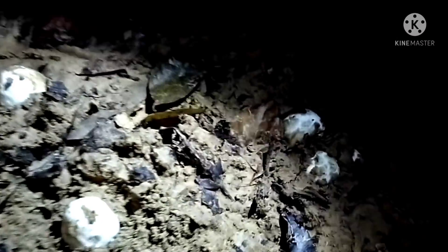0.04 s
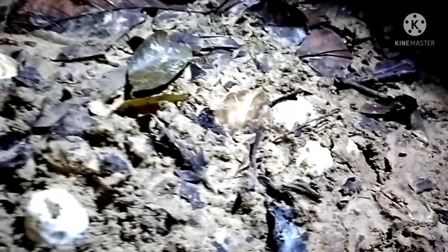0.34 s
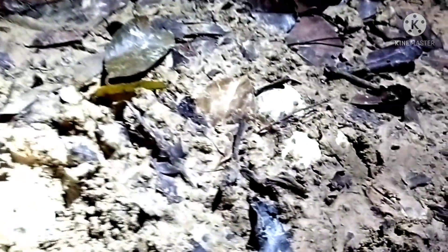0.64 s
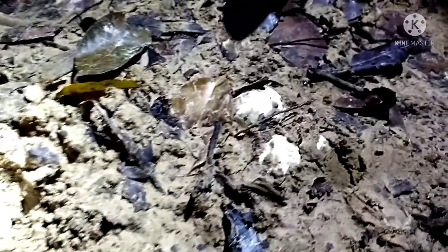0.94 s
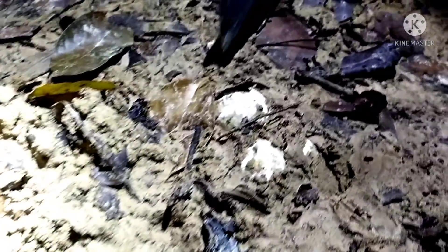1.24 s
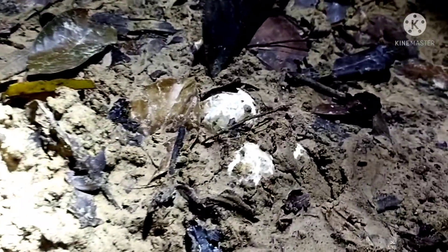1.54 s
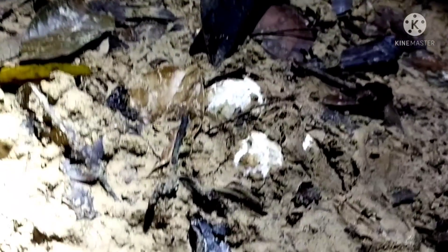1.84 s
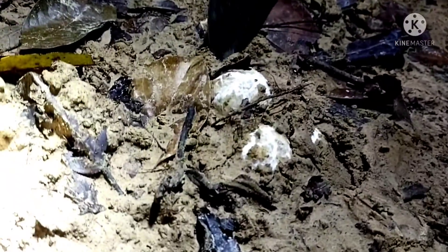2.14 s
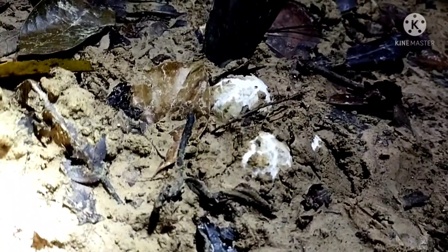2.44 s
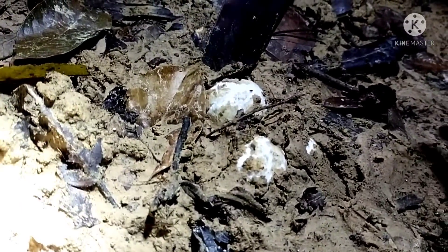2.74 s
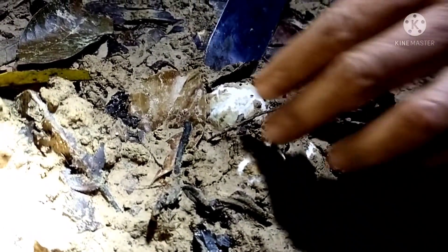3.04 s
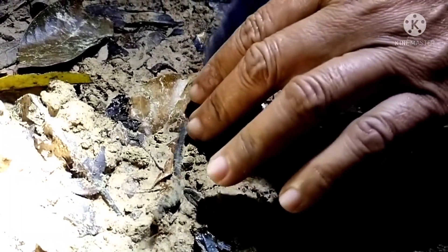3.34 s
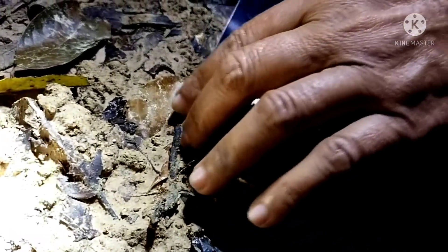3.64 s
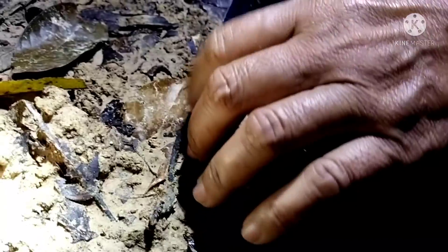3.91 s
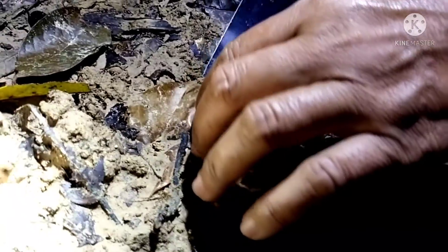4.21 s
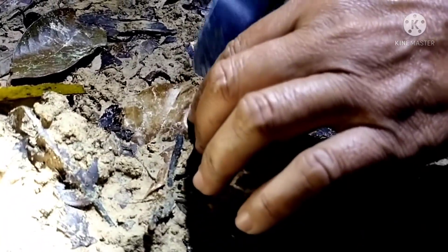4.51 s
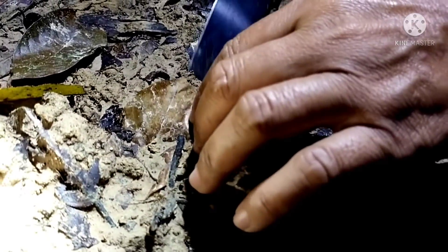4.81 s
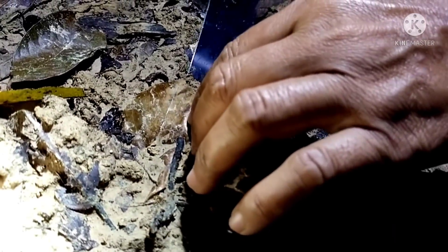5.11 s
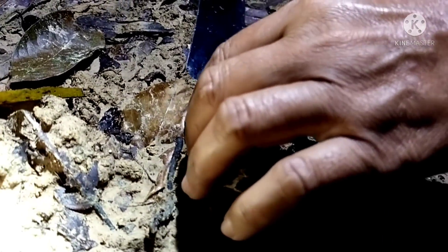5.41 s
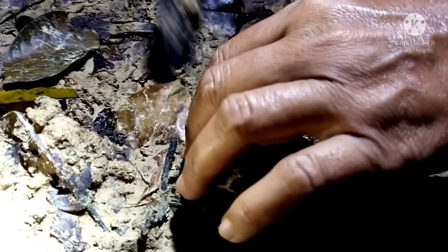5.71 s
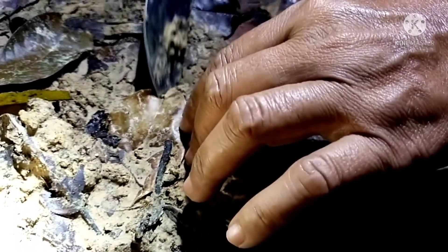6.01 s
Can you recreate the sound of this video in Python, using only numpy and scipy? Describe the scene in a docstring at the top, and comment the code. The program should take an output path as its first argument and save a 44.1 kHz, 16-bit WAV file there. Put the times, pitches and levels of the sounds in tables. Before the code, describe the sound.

High insect chirps pulse about four times a second over a soft night forest hush. Close by, dry leaves stir and crumbs of soil click, with soft thuds and a dead knock on the right at 0.8 seconds. From 1 second a blade scrapes into soil and leaves, crunching and crackling, the steel ringing faintly. Around 2 seconds the hush drops and the insects thin out, while the digging turns lighter. A stronger gritty scrape comes at 2.6 seconds, then short rustling strokes; the higher insects return at about 3.2. At 4.1 seconds a root or twig snaps loudly, the sharpest sound, followed by crumbling clicks. The blade drags with a hollow hiss near 4.8, and a cluster of crackles falls between 5.3 and 5.7. From about 6 seconds a rasping, gritty drag ends in a click and soft thud, with insects still chirping.

```python
"""A forest floor at night: close by, a blade scrapes and pries in crumbly soil and dry leaves.
Countless tiny breaks make the soil crunch, the leaves rustle and the grit hiss, and grains catching
on the steel make it ring. Bigger crumbs click, there are soft thuds and one dead knock, and once a root
or twig snaps loudly. Behind it, groups of insects chirp by rubbing their wings, over a soft hush."""
import numpy as np
from scipy import signal
from scipy.fft import rfft, irfft, next_fast_len
from scipy.ndimage import uniform_filter1d, map_coordinates
import sys
import numpy as np
from scipy import signal
from scipy.fft import rfft, irfft, next_fast_len
from scipy.io import wavfile
from scipy.ndimage import uniform_filter1d, map_coordinates

SR = 44100
rng = np.random.default_rng(int(sys.argv[2]) if len(sys.argv) > 2 else 0)


def unload_audio(sound):
    """Save the sound as a 16-bit wav file, at the path given as the first command line argument."""
    columns = np.transpose(np.atleast_2d(sound))
    # keep every value between -1 and 1, then stretch to whole-number steps
    steps = np.round(np.clip(columns, -1, 1) * 32767)
    wavfile.write(sys.argv[1], SR, steps.astype(np.int16))


N = 276066
TIME = np.arange(N) / SR
FFT_SIZE = next_fast_len(N, real=True)
FFT_HZ = np.fft.rfftfreq(FFT_SIZE, 1 / SR)

# Levels are starting values that a function may shift. A side_db above 0 is left, below 0 is right.
# blade strokes through the ground: start_s, rise_s, hold_s, release_s, soil_db, leaves_db, grit_db, tip_db
STROKES = [(1.03, 0.44, .17, .2, -58, -51, -56, -56.5), (1.34, 0.054, 0.036, .08, -65, -49.5, -64, -52.5),
           (1.66, 0.013, 0.13, 0.13, -62.5, -54.5, -63, -63), (1.8, 0.038, 0.26, .1, -85, -80, -73.5, -81),
           (1.935, 0.013, 0.013, 0.12, -72, -62, -71, -66.5),
           (2.04, 0.053, 0.13, 0.2, -63.5, -61.5, -62.5, -69.5),
           (2.16, 0.013, 0.057, .05, -75, -59.5, -59, -76),
           (2.3, 0.011, 0.067, 0.97, -81.5, -63, -63.5, -74.5),
           (2.545, 0.021, 0.07, 0.042, -54.5, -49.5, -47.5, -59),
           (2.635, 0.011, .015, 0.11, -52.5, -65, -79, -67),
           (2.77, 0.0081, 0.16, 0.034, -79, -67, -102, -75.5),
           (2.965, 0.024, 0.0091, 0.042, -65, -61, -67.5, -76),
           (3.03, 0.0087, 0.093, 0.13, -91, -62, -73, -71),
           (3.275, 0.061, 0.089, 0.029, -81, -62, -65, -98),
           (3.403, 0.053, 0.02, 0.1, -55.5, -44.5, -49.5, -68),
           (3.6, 0.036, 0.055, 0.2, -93, -58.5, -58.5, -69.5),
           (3.78, 0.098, 0.31, 0.36, -61, -52.5, -62, -65), (3.915, 0.02, 0.017, 0.059, -70, -51, -82, -60),
           (4.072, 0.005, 0.05, 0.1, -63, -53, -57.5, -70),
           (4.148, 0.028, 0.044, 0.084, -54.5, -42.5, -57, -58),
           (4.28, 0.026, 0.025, 0.12, -66.5, -54, -63.5, -75),
           (4.42, 0.039, 0.036, 0.055, -71, -57, -67, -78),
           (4.49, 0.059, 0.039, 0.14, -73.5, -62, -56.5, -86),
           (4.67, 0.23, 0.067, 0.07, -65, -56, -51, -76), (4.98, 0.021, 0.16, .15, -92.5, -82, -75.5, -82),
           (5.17, 0.054, 0.11, .1, -90, -65.5, -75, -83),
           (5.31, 0.08, 0.051, 0.22, -59.5, -48.5, -59.5, -77),
           (5.56, 0.038, 0.051, 0.11, -55.5, -51, -58.5, -78),
           (5.63, 0.059, 0.022, 0.079, -62.5, -52.5, -50.5, -75),
           (5.94, 0.06, 0.35, 0.094, -64, -58, -52, -67.5), (6.0, 0.3, .05, .1, -70, -54, -68, -70)]
STROKE_SOIL, STROKE_LEAVES, STROKE_GRIT, STROKE_TIP = 4, 5, 6, 7  # column numbers
# light stirring of the leaves between strokes: time_s, level_db
STIR = [(0, -58), (.55, -64.5), (.95, -54), (1.3, -76), (1.9, -78), (3.25, -75), (4.5, -86), (5.25, -74.5),
        (5.9, -92.5)]
# crumbs and leaves giving way: start_s, soil_db, leaves_db, grit_db, grit_side_db, ring_hz
CLICKS = [(0.029, -55, -49.5, -77, 0, 2470), (0.102, -68, -53, -75, 0, 1850),
          (0.2277, -51, -47.5, -80, 0, 750), (0.2707, -46.5, -71, -54.5, 7, 3400),
          (0.3381, -47.5, -52, -77, 0, 586), (0.61, -45, -40.5, -70, 1, 490),
          (0.631, -49, -54, -74, 0, 330), (0.667, -49, -47.5, -66, 0, 296), (0.685, -49, -58, -77, 0, 437),
          (0.895, -44.5, -50.5, -76, 1, 433), (1.342, -41, -53, -70, 0, 750),
          (1.404, -44, -45, -48.5, 1, 2650), (1.5177, -63, -41.5, -56, 0, 2540),
          (1.575, -58, -41.5, -55.5, 0.5, 2790), (1.5827, -43, -43.5, -49, 14, 1150),
          (1.624, -56, -46, -54, 0, 1200), (1.6751, -43, -37.5, -50, -4, 1750),
          (1.679, -39.5, -41.5, -60, -6, 3200), (1.7246, -67, -36, -46.5, 8, 1910),
          (1.7425, -37, -37, -51, -1, 1080), (1.755, -66, -53, -49, 0, 2200),
          (1.782, -63, -53, -49, 6, 2600), (1.795, -57, -49.5, -56, 5, 423),
          (1.9468, -54, -46.5, -62, 4, 1260), (2.089, -60, -57, -64, 0, 1390),
          (2.117, -51, -61, -58, 0, 471), (2.158, -54, -57, -47.5, 0, 1470),
          (2.2427, -46, -51, -59, 4, 385), (2.3145, -49, -44.5, -52, -2, 1115),
          (2.5562, -38.5, -37, -45, 0, 666), (2.601, -50, -46, -49, 0, 1400),
          (2.634, -46, -48, -51, 0, 750), (2.654, -39, -39.5, -40, -4, 657),
          (2.6597, -34, -60, -58, 2, 553), (2.7061, -49, -61, -86, 2, 425),
          (2.766, -56, -60.5, -74, -2, 565), (3.0432, -60, -55, -73, 8, 1320),
          (3.0687, -75, -51, -62, -1, 1740), (3.1835, -48, -54, -99, -1, 980),
          (3.4097, -51, -41, -72, -2, 1740), (3.6113, -73, -62, -56, -10, 2500),
          (3.7585, -65, -75, -46, -6, 1310), (3.83, -47, -53, -58, 4, 1450),
          (3.8794, -64, -44.5, -68, -5, 1700), (3.946, -59, -49, -70, -3, 1130),
          (4.102, -41, -40.5, -59, -1, 1150), (4.171, -37.5, -39, -59, -11, 340),
          (4.2059, -35.5, -40, -66, -5, 780), (4.401, -46, -65, -56.5, -4, 990),
          (4.559, -62, -54, -74, -12, 587), (4.728, -69, -50.5, -51.5, 12, 1480),
          (4.803, -53, -52, -60, 0, 750), (4.8389, -46.5, -50, -64, 0, 1130),
          (4.852, -47, -52, -66, 0, 705), (4.8947, -40.5, -42, -63.5, 6, 663),
          (5.015, -92, -87, -58, -7.5, 2120), (5.165, -72, -49.5, -58.5, 1, 1700),
          (5.3061, -50, -45, -60, -10, 1520), (5.3666, -57, -42, -45.5, -11, 970),
          (5.3734, -59, -32.5, -47, -1, 1020), (5.4016, -36.5, -43, -70, -2, 666),
          (5.4985, -41, -34.5, -51.5, -10, 1050), (5.608, -38, -40.5, -67, 1, 570),
          (5.613, -45, -41.5, -70, -2, 386), (5.6245, -60, -44, -67, -4, 1340),
          (5.7157, -66, -55, -44, 10, 2200), (5.961, -57, -56.5, -50, -8, 760),
          (6.008, -64, -54, -47.5, -6, 1900), (6.055, -66, -50, -48, -1, 2500),
          (6.125, -63, -50, -45, -12, 3280), (6.1615, -66, -48, -43, -6, 3300),
          (6.202, -49, -51, -44, -4, 821), (6.2243, -36.5, -38, -42.5, -3, 824)]
CLICK_SOIL, CLICK_LEAVES, CLICK_GRIT = 1, 2, 3  # column numbers
# the tone of each material, from bass to treble: frequency_hz, gain_db
SOIL_TONE = [(30, -48), (60, -26.5), (100, -0.5), (160, 1), (250, -2), (400, 5), (620, 2.5), (760, 0.5),
             (1100, -56.5), (2500, -78)]
LEAF_TONE = [(60, -55.5), (300, -33.5), (600, -33.5), (760, 1), (920, 0.5), (1100, 4), (1450, 3),
             (2000, 0.5), (2500, 3.5), (3200, -3), (4300, -2.5), (5300, -12.5), (7000, -18), (12000, -51)]
GRIT_TONE = [(60, -50.5), (400, -23), (1500, -20.5), (3300, 4), (4500, 0.5), (5800, 0.5), (7200, -5),
             (8300, 2), (9200, 4.5), (10300, -1.5), (11600, -3), (13000, -4.5), (15000, -7.5),
             (16000, -18.5)]
# where the grit hisses: time_s, side_db
GRIT_SIDE = [(0, 3), (2.5, 0), (5.7, -1), (6.1, -3.5)]
# each microphone hears the grit's treble differently: frequency_hz, side_db
GRIT_BALANCE = [(5000, 1), (7000, -1.5), (8200, 4.5), (9300, -6.5), (11000, -3), (15000, 1)]
# where the digging is, as how much sooner its sound arrives on the right: time_s, lead_ms
RIGHT_LEAD = [(0, -0.3), (1.85, -0.28), (2.15, 0.16), (2.6, 0.11), (3.4, 0.055), (4.07, 0.13), (5.3, 0.14),
              (6.1, 0.21)]

# the flat of the blade dragging: start_s, rise_s, hold_s, release_s, hollow_db, rasp_db
DRAGS = [(2.545, 0.019, .09, 0.046, -63, -69.5), (4.7, 0.18, 0.072, 0.074, -56.5, -78),
         (5.94, 0.072, 0.3, 0.55, -55.5, -48.5)]
# the edge sliding, which makes the blade ring: start_s, rise_s, hold_s, release_s, level_db
SLIDES = [(1.1, 0.25, 0.25, 0.3, -58), (1.8, 0.03, 0.25, 0.15, -67.5), (2.66, 0.009, 0.03, 0.13, -70)]
# how the blade rings on its flat (hollow, rasp), tip and free length: pitch_hz, width_hz, gain_db
BLADE_HOLLOW = [(660, 280, -8.5), (1360, 88, -16), (1700, 90, -28), (2066, 180, -9.5), (2440, 330, -9)]
BLADE_RASP = [(9250, 890, 0)]
BLADE_TIP = [(420, 510, -0.5), (1150, 390, -2.5), (1984, 170, 5), (2790, 330, 2)]
BLADE_RING = [(670, 140, -2.5), (1190, 190, 0), (1874, 140, 2.5), (2770, 160, -6)]
# loosened earth shifting: start_s, rise_s, hold_s, release_s, level_db
EARTH_SHIFTS = [(2.662, 0.008, 0.018, 0.12, -60), (2.838, 0.011, 0.081, 0.063, -69),
                (2.966, 0.012, 0.019, 0.04, -64), (3.026, 0.011, 0.013, 0.033, -64.5)]
# the dull body of damp earth: pitch_hz, width_hz, gain_db
EARTH_BODY = [(400, 160, 3), (570, 110, -10.5)]

# the loud snap and its quick, softer echo: start_s, ring_db, tick_db
SNAP_AND_ECHO = [(4.069, -12, -23), (4.072, -23, -33)]
# the notes of the snapping wood: pitch_hz, level_db, fade_s (to fall 60 dB), right_lead_ms, side_db
SNAP_NOTES = [(483, -15, 0.035, .05, -2), (640, -10, 0.018, 0.21, -8), (1145, 1, 0.01, 0.16, -1),
              (1450, 9, 0.0062, 0.16, 2.5), (1680, -14, 0.021, 0.22, 1.5), (2570, 3.5, 0.0081, -0.063, -5),
              (2830, -7, 0.0084, 0.12, 3), (3000, -3.5, 0.011, 0.072, -1), (4120, -20.5, 0.04, 0.071, -6.5),
              (5380, -23.5, 0.012, 0.11, 1)]
# the tone of the knock's bright tick: frequency_hz, gain_db
KNOCK_TICK_TONE = [(2000, -21), (3200, 6), (4500, -6), (6500, -9), (8500, 1), (9700, 8.5), (11500, -1),
                   (15000, -9)]
# soft low thuds, some alone, one under the knock and one under the snap: start_s, level_db, pitch_hz
THUDS = [(0.612, -49, 176), (0.7732, -42.5, 216), (1.592, -48.5, 190), (4.0689, -48, 148.7),
         (4.557, -58, 120), (5.606, -49, 138), (6.224, -48, 222)]

# the wing rasp of each insect group, lowest to highest: pitch_hz, width_hz, gain_db
LOW_SONG = [(4000, 120, -8), (3860, 210, -4.5), (4070, 330, -11.5)]
MIDDLE_SONG = [(4270, 220, 3.5), (4586, 240, 0)]
HIGH_SONG = [(4775, 270, 6), (5010, 200, -1.5), (4450, 180, -9.5)]
THIN_SONG = [(8150, 380, 0)]
# chirps of the low insects: middle_s, length_s, whistle_db, rasp_db, pitch_hz
LOW_CHIRPS = [(0.012, 0.11, -59, -65, 4010), (0.204, 0.26, -59, -66, 3993), (0.479, 0.16, -55, -57, 4054),
              (0.774, 0.31, -56, -63, 4030), (1.0, 0.28, -54.5, -61, 4015), (1.288, .24, -63, -66, 3930),
              (1.581, 0.2, -55.5, -62, 4020), (1.839, 0.18, -69, -67.5, 4050),
              (2.092, 0.15, -63, -64, 4012), (2.333, 0.34, -62, -61.5, 3886), (2.619, 0.23, -59, -58, 3980),
              (2.92, 0.27, -60.5, -59.5, 4030), (3.175, 0.24, -61, -59.5, 4033),
              (3.46, 0.22, -55, -58, 4003), (3.71, 0.24, -58.5, -61, 4025), (3.96, 0.26, -63, -61, 4000),
              (4.272, 0.22, -57.5, -72, 4010), (4.53, 0.28, -57.5, -59, 4010),
              (4.787, 0.26, -59.5, -61, 4024), (5.054, 0.31, -61.5, -62, 4016),
              (5.33, 0.26, -59, -60.5, 4000), (5.562, 0.17, -61.5, -62, 4030),
              (5.828, 0.17, -62.5, -64.5, 4034), (5.858, 0.04, -55.5, -66, 4180),
              (6.099, 0.3, -55, -58.5, 4015)]
# low insects farther off fill the gaps, mostly at first: time_s, level_db
LOW_LEVEL = [(0, -60), (1.0, -58), (1.6, -57), (1.9, -68), (2.5, -75), (4.6, -74), (4.92, -59.5),
             (5.2, -74.5), (5.45, -70.5), (6.26, -69)]
# a far group of middle pitch, too many to have a beat: time_s, level_db
MIDDLE_LEVEL = [(0, -60.5), (1, -62), (1.7, -62.5), (2.15, -75.5), (3.2, -76.5), (5.5, -72.5), (5.85, -73),
                (6.26, -78.5)]
# the high insects, who pause twice: time_s, top_db, dip_db (the drop between chirps)
HIGH_LEVEL = [(0, -57.5, 11), (1.0, -57.5, 11), (1.5, -62.5, 10), (1.949, -83, 5.57), (2.85, -83, 6.6),
              (3.25, -63, 2), (4.3, -60, 6.4), (5.401, -60, 9.6), (5.85, -90, 5.7), (6.051, -76, 6.9),
              (6.26, -84, 8)]
# a thin, faint shrilling that soon dies away: time_s, level_db
THIN_LEVEL = [(0, -78.5), (1.05, -75), (1.5, -90), (2, -105)]
# the tone of the night air: frequency_hz, gain_db
AIR_TONE = [(25, -28.5), (60, -6), (130, 7.5), (200, 4.5), (400, -2.5), (900, -5), (1500, -4.5), (3000, -8),
            (5500, -12), (7000, -21), (9000, -15.5), (12000, -26.5), (15000, -26)]
# the background hush, full at first, then turned down by the recorder's noise suppression: time_s, level_db
HUSH_LEVEL = [(0, -59.5), (1.1, -58), (1.7, -68), (2, -73.5), (6.26, -71.5)]


def ground():
    """The blade breaks up soil, leaves and grit; now and then a larger crumb cracks through."""
    big_crumbs = crumbling(per_s=45, spread_db=2.5, rubbing=0, jerk_db=1, shared=0.69)
    return soil() + leaves(big_crumbs) + grit(big_crumbs) + click_rings()


def soil():
    """Breaking soil makes a low crunch."""
    crunch = crumbling(per_s=800, spread_db=2.1, rubbing=0.54, jerk_db=3.1, shared=0.57)
    crunch = unit(patchy(crunch, depth_db=2.3, width_hz=220, size=512))
    breaks = amp(-17) * clicks(CLICK_SOIL, spray=1, decay_s=0.0058, shared=0.93)
    return colour(effort(STROKE_SOIL, stir_db=-8) * crunch + breaks, SOIL_TONE)


def leaves(big_crumbs):
    """Dry leaves rustle in the middle range, each with its own pitches while it is touched."""
    rustle = crumbling(per_s=1100, spread_db=5, rubbing=1, jerk_db=2, shared=0.71, apart_hz=2110)
    rustle = patchy(rustle, depth_db=1.6, width_hz=350)
    rustle = unit(patchy(rustle, depth_db=4.4, width_hz=130, size=4096))
    strokes = effort(STROKE_LEAVES) * (amp(-1.5) * rustle + amp(-12) * big_crumbs)
    breaks = amp(-7.5) * clicks(CLICK_LEAVES, spray=1, decay_s=0.0059, shared=0.69)
    breaks = cut(breaks, 2600, "lowpass", order=1)  # breaks sound woodier than the rustle
    return colour(strokes + breaks, LEAF_TONE)


def grit(big_crumbs):
    """Fine grit hisses along the blade."""
    hiss = crumbling(per_s=3000, spread_db=2.3, rubbing=0.94, jerk_db=1.47, shared=0.34)
    hiss = unit(patchy(hiss, depth_db=2, width_hz=700)) * pan(follow(GRIT_SIDE)[0])
    strokes = effort(STROKE_GRIT, stir_db=-12.5) * (amp(1.32) * hiss + amp(-11.5) * big_crumbs)
    breaks = amp(-7.5) * clicks(CLICK_GRIT, spray=0.78, decay_s=0.0028, shared=0.16, sided=True)
    return shape_tone(colour(strokes + breaks, GRIT_TONE), pan(look_up(GRIT_BALANCE, FFT_HZ)))


def crumbling(per_s, spread_db, rubbing, jerk_db, shared, apart_hz=9000):
    """Tiny breaks of very unequal size over smooth rubbing; the level jerks as it sticks and slips."""
    sizes = amp(spread_db * np.minimum(rng.exponential(1, N), 4))
    happens = rng.random(N) < per_s / SR
    breaks = unit(rng.choice([-1., 1.], (3, N)) * sizes * happens)
    texture = breaks + rubbing * rng.standard_normal((3, N))
    shared = shared / (1 + (FFT_HZ / apart_hz) ** 2)  # short waves differ more between left and right
    both_sides = irfft(stereo(rfft(texture, FFT_SIZE), shared), FFT_SIZE)[:, :N]
    return both_sides * amp(jerk_db * flutter(35))


def clicks(column, spray, decay_s, shared, sided=False, size=900):
    """Each click is one sharp break and a quickly dying spray of crumbs."""
    out, t = np.zeros((2, N)), np.arange(size) / SR
    for row in CLICKS:
        start_s, *_, side_db, _ = row
        burst = spray * unit(noise(shared, size) * np.exp(-t / decay_s))
        burst[:, 0] += np.sqrt(size) / 2  # the break itself
        add(out, start_s, amp(row[column]) * unit(burst) * (pan(side_db) if sided else 1))
    return out


def click_rings(decay_cycles=1.78, size=2500):
    """Each piece that gives way rings for a cycle or two at its own pitch."""
    out, t = np.zeros((2, N)), np.arange(size) / SR
    for start_s, soil_db, leaves_db, _, _, pitch_hz in CLICKS:
        cycles = t * pitch_hz
        ring = np.sin(2 * np.pi * cycles) * np.exp(-cycles / decay_cycles) * (1 - np.exp(-cycles / .5))
        add(out, start_s, amp(max(soil_db, leaves_db) - 17.5) * unit(ring))
    return out


def pressing(strokes, column, release_db=24.5):
    """Loudness of a set of strokes: each builds up, holds and dies away; their powers add."""
    power = np.zeros(N)
    for row in strokes:
        start_s, rise_s, hold_s, release_s = row[:4]
        age = TIME[round(start_s * SR):] - start_s
        pressure = np.clip(age / rise_s, 0, 1) ** 0.62
        fade_db = release_db * np.clip((age - rise_s - hold_s) / release_s, 0, 10)
        power[N - len(age):] += (pressure * amp(row[column] - fade_db)) ** 2
    return np.sqrt(power)


def effort(column, stir_db=0):
    """Loudness of one material: the strokes over the light stirring between them."""
    return np.hypot(pressing(STROKES, column), amp(follow(STIR)[0] + stir_db))


def blade():
    """Grains catch on steel: the flat sounds hollow and rasps, the tip grates, the free length rings."""
    grains = crumbling(per_s=710, spread_db=2.4, rubbing=0.44, jerk_db=0.89, shared=0.63)
    hollow = drifting(resonate(grains, BLADE_HOLLOW), depth=0.036, rate_hz=5) * pressing(DRAGS, column=4)
    grains = crumbling(per_s=700, spread_db=3.2, rubbing=0.35, jerk_db=1.3, shared=0.34)
    rasp = resonate(grains, BLADE_RASP) * pressing(DRAGS, column=5) * amp(-7) * pan(-25)
    grains = crumbling(per_s=900, spread_db=3.5, rubbing=0.424, jerk_db=3, shared=0.92, apart_hz=2500)
    tip = drifting(resonate(grains, BLADE_TIP), depth=.018, rate_hz=3) * effort(STROKE_TIP, stir_db=-20.5)
    grains = crumbling(per_s=1200, spread_db=2.2, rubbing=0.6, jerk_db=1.1, shared=0.76)
    ring = resonate(grains, BLADE_RING) * pressing(SLIDES, column=4)
    return hollow + rasp + tip + ring


def drifting(sound, depth, rate_hz):
    """The pitch slides up and down at random, as when the blade sinks in and comes free."""
    position = np.cumsum(1 + depth * flutter(rate_hz))
    return np.array([map_coordinates(side, [position], order=3, mode="reflect") for side in sound])


def damp_earth():
    """Damp crumbs roll over each other with a soft, low mutter."""
    crumbs = crumbling(per_s=400, spread_db=2.4, rubbing=0.4, jerk_db=1, shared=0.74)
    return resonate(crumbs, EARTH_BODY) * pressing(EARTH_SHIFTS, column=4)


def at_digging_spot(sound):
    """Sound from the spot being dug reaches left and right at slightly different times."""
    shift = follow(RIGHT_LEAD)[0] / 1000 * SR / 2
    positions = np.arange(N) - shift, np.arange(N) + shift
    return np.array([map_coordinates(side, [at], order=3) for side, at in zip(sound, positions)])


def snap(size=3000):
    """A root or twig breaks: a short woody ring with a bright tick, then a quick, softer echo."""
    ring, tick, t = np.zeros((2, N)), np.zeros((2, N)), np.arange(size) / SR
    wood = 0
    for pitch_hz, level_db, fade_s, lead_ms, side_db in SNAP_NOTES:
        age = np.maximum(t + np.array([[-1], [1]]) * lead_ms / 1000 / 2, 0)
        opening = 1 - np.exp(-age / 0.00019)  # the break takes a moment to open
        note = amp(level_db - 60 * age / fade_s) * np.sin(2 * np.pi * pitch_hz * age)
        wood = wood + note * opening * pan(side_db)
    for start_s, ring_db, tick_db in SNAP_AND_ECHO:
        add(ring, start_s, amp(ring_db) * wood)
        add(tick, start_s, amp(tick_db) * noise(0.17, size) * np.exp(-t / 0.0013))
    return cut(ring, 530, "highpass") + colour(tick, GRIT_TONE)


def knock_and_thuds(knock_s=.7727, side_db=-26, size=300):
    """One dead knock with a bright tick on the right, and a few soft low thuds."""
    body, tick, t = np.zeros((2, N)), np.zeros((2, N)), np.arange(size) / SR
    add(body, knock_s, amp(-22) * thump(pitch_hz=705, decay_s=0.00044) * pan(side_db))
    spray = 0.11 * rng.standard_normal(size) * np.exp(-t / 0.00028)  # crumbs that follow the tick
    add(tick, knock_s, amp(-36.5) * unit((t == 0) + spray))
    for start_s, level_db, pitch_hz in THUDS:
        add(body, start_s, amp(level_db) * thump(pitch_hz, decay_s=0.0019))
    return cut(body, 120, "highpass") + colour(tick, KNOCK_TICK_TONE) * pan(side_db)


def thump(pitch_hz, decay_s, size=2500):
    """A muffled swing that swells and dies within a cycle or two."""
    t = np.arange(size) / SR
    return np.sin(2 * np.pi * pitch_hz * t) * t / decay_s * np.exp(1 - t / decay_s)


def low_insects():
    """The low insects whistle and rasp to the left; each chirp has its own pitch."""
    rasp_db = 20 * np.log10(np.hypot(chirp_swells(column=3), amp(follow(LOW_LEVEL)[0])))
    rasp = wings(rasp_db, LOW_SONG, flutter_db=2.86, shared=0.075, side_db=2.8)
    middle_s, *_, pitch_hz = np.transpose(LOW_CHIRPS)
    nearest_chirp = np.searchsorted((middle_s[1:] + middle_s[:-1]) / 2, TIME)
    tone = whistle(pitch_hz[nearest_chirp], waver_hz=12.79, per_s=33, sharp=0.37, uneven_db=1.7, echo=0.37)
    return rasp + tone * chirp_swells(column=2) * pan(5)


def chirp_swells(column):
    """Loudness of the low insects' chirps, each a rounded swell."""
    gain = np.zeros(N)
    for row in LOW_CHIRPS:
        middle_s, length_s = row[:2]
        arch = np.cos(np.pi * np.clip((TIME - middle_s) / length_s, -.5, .5)).clip(0)
        gain += amp(row[column]) * arch ** 1.4
    return gain


def high_insects(first_s=.165, period_s=.2615):
    """The high insects chirp to a steady beat on the right; the nearest one stands out as pips."""
    top_db, dip_db = follow(HIGH_LEVEL)
    off_beat = 2 * abs(((TIME - first_s) / period_s + .5) % 1 - .5)  # 0 on a beat, 1 midway between
    level_db = top_db - dip_db * np.sin(np.pi / 2 * off_beat) ** 2.8
    tone = whistle(pitch_hz=4990, waver_hz=52, per_s=21, sharp=2.68, uneven_db=2, echo=.3)
    pips = tone * amp(level_db - 8.5) * pan(-2)
    return wings(level_db, HIGH_SONG, flutter_db=3.2, shared=0.062, side_db=-2) + pips


def whistle(pitch_hz, waver_hz, per_s, sharp, uneven_db, echo):
    """One near insect: a wavering tone in quick pulses; echoes shake it differently on each side."""
    beat = np.cumsum(per_s * (1 + .12 * flutter(8))) / SR
    pulses = abs(np.sin(np.pi * beat)) ** sharp * amp(uneven_db * flutter(per_s))
    phase = 2 * np.pi * np.cumsum(pitch_hz + waver_hz * (flutter(22) + .7 * flutter(4))) / SR
    sides = [np.sin(angle) * (1 + echo * flutter(90)) + np.cos(angle) * echo * flutter(90)
             for angle in (phase, phase + np.pi / 2)]
    return unit(pulses * np.array(sides))


def far_insects():
    """Two groups without a beat: a crowd of middle pitch and a thin, faint shrilling."""
    middle = wings(follow(MIDDLE_LEVEL)[0], MIDDLE_SONG, flutter_db=4.1, shared=0.075, side_db=.6)
    thin = wings(follow(THIN_LEVEL)[0], THIN_SONG, flutter_db=1.5, shared=0.23, side_db=0.27)
    return middle + thin


def wings(level_db, song, flutter_db, shared, side_db):
    """Many wings rasp at a few pitches; distance smears their pulses into a fluttering whistle."""
    rasp = resonate(noise(shared), song)
    loudness = np.sqrt(uniform_filter1d(rasp ** 2, size=440) + .01)
    steadier = rasp / loudness ** .35  # each insect holds its loudness through a chirp
    return unit(steadier * amp(flutter_db * flutter(100))) * amp(level_db) * pan(side_db)


def night_air():
    """The soft hush of the forest, coming from all around."""
    hush = unit(patchy(noise(shared=0.047), depth_db=2.9, width_hz=300, size=512))
    return amp(follow(HUSH_LEVEL)[0]) * colour(hush, AIR_TONE)


def amp(db):
    """Turns decibels into a number to multiply by."""
    return 10 ** (np.asarray(db) / 20)


def unit(x):
    """Scales a signal to an average power of 1."""
    return x / np.sqrt(np.mean(x ** 2) + 1e-20)


def look_up(table, hz):
    """Reads a table at any frequency, blending between rows on a musical (log) scale."""
    row_hz, value = np.transpose(table)
    return np.interp(np.log(hz + 1), np.log(row_hz + 1), value)


def follow(table):
    """Turns each column after time_s into a curve with one value per sample."""
    time_s, *columns = np.transpose(table)
    return [np.interp(TIME, time_s, column) for column in columns]


def add(mix, start_s, sound):
    """Mixes a sound in at its start time."""
    part = mix[:, round(start_s * SR):][:, :sound.shape[-1]]
    part += sound[..., :part.shape[1]]


def pan(side_db):
    """Left and right gains that keep the total power the same."""
    gains = np.array([amp(side_db / 2), amp(-side_db / 2)]).reshape(2, -1)
    return gains / np.sqrt(np.mean(gains ** 2, 0))


def stereo(x, shared):
    """Three unrelated signals become left and right; both sides share the first."""
    return np.sqrt(shared) * x[0] + np.sqrt(1 - shared) * x[1:]


def noise(shared, size=N):
    """Plain hiss, partly the same on both sides."""
    return stereo(rng.standard_normal((3, size)), shared)


def flutter(rate_hz):
    """Random wavering, up to about the given rate."""
    return unit(np.interp(TIME * rate_hz * 2, np.arange(4096), rng.standard_normal(4096)))


def patchy(x, depth_db, width_hz, size=256):
    """Lifts and lowers random bands from moment to moment, as if each fragment had its own pitch."""
    bands = signal.stft(x, nperseg=size)[2]
    bands_wide = max(1, round(width_hz * size / SR))
    patches = uniform_filter1d(rng.standard_normal(bands.shape[1:]), bands_wide, axis=0)
    patches = unit(uniform_filter1d(patches, size=3, axis=1))
    return signal.istft(bands * amp(depth_db * patches), nperseg=size)[1][:, :N]


def colour(x, tone, size=2048):
    """Gives a sound a tone; nothing rings ahead of a click, so its front stays sharp."""
    log_gain = np.log(amp(look_up(tone, abs(np.fft.fftfreq(size, 1 / SR)))))
    taps = np.fft.ifft(np.exp(np.conj(signal.hilbert(log_gain)))).real  # minimum-phase filter
    return signal.oaconvolve(x, taps[None] / np.linalg.norm(taps), axes=1)[:, :N]


def shape_tone(x, gains):
    """Multiplies each frequency by its own gain."""
    return irfft(rfft(x, FFT_SIZE) * gains, FFT_SIZE)[:, :N]


def resonate(x, peaks):
    """Makes a sound ring at a few pitches, at an average power of 1."""
    gains = sum(amp(gain_db) / (1 + ((FFT_HZ - pitch_hz) / (width_hz / 2)) ** 2) ** 1.5
                for pitch_hz, width_hz, gain_db in peaks)
    return unit(shape_tone(x, gains))


def cut(x, hz, kind, order=2):
    """Gently removes the bass ("highpass") or the treble ("lowpass")."""
    return signal.sosfilt(signal.butter(order, hz, kind, fs=SR, output="sos"), x)


def scene():
    """The digging close by, the forest behind it."""
    digging = at_digging_spot(ground() + blade() + damp_earth()) + snap() + knock_and_thuds()
    return digging + low_insects() + high_insects() + far_insects() + night_air()


def record(dry):
    """Removes the very highest treble, above 15600 Hz."""
    return signal.oaconvolve(dry, signal.firwin(255, 15600, window=("kaiser", 8), fs=SR)[None], "same")


dry = scene()
out = record(dry)
unload_audio(out)
```